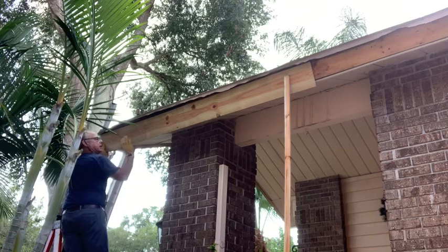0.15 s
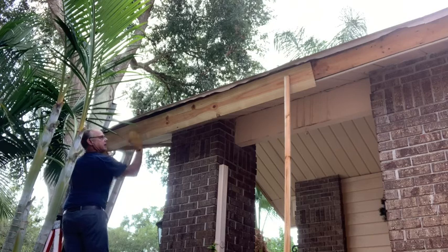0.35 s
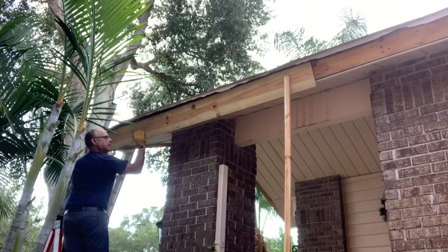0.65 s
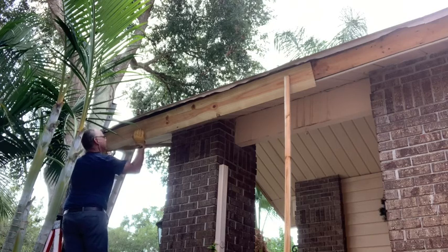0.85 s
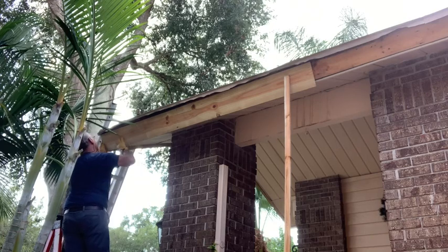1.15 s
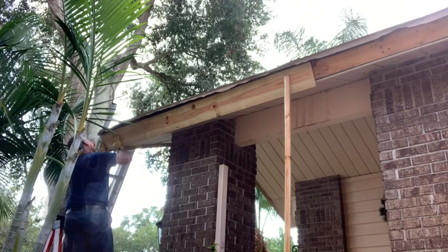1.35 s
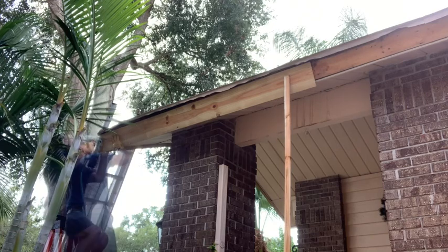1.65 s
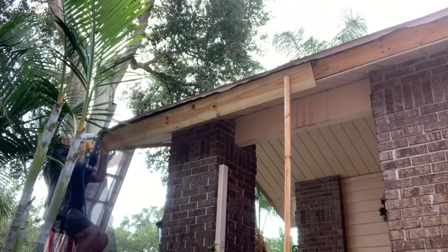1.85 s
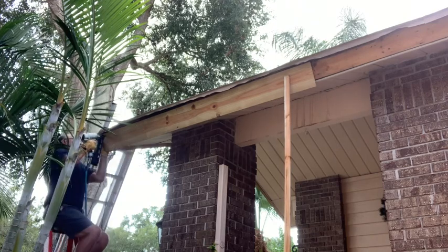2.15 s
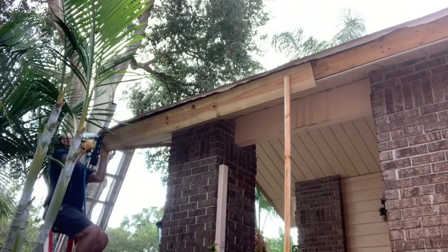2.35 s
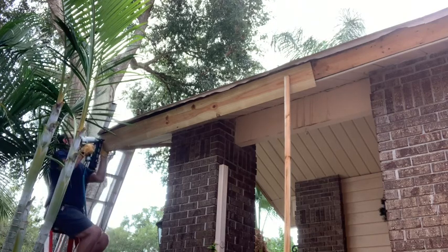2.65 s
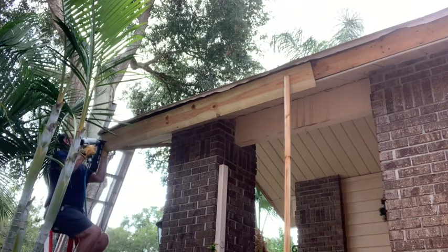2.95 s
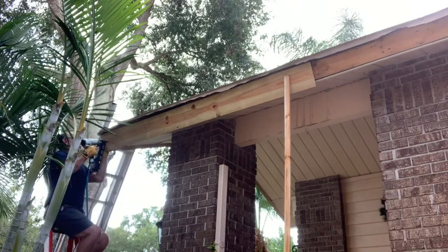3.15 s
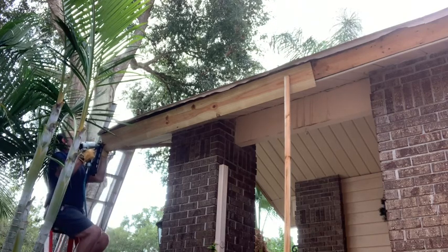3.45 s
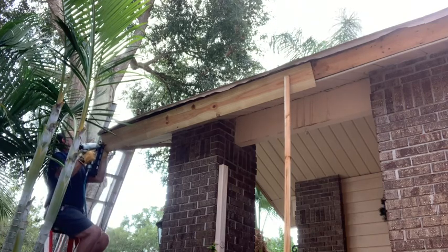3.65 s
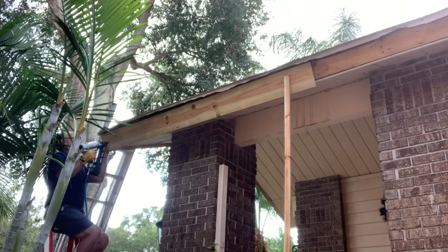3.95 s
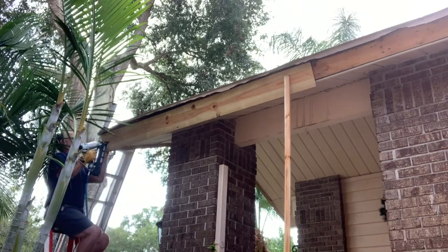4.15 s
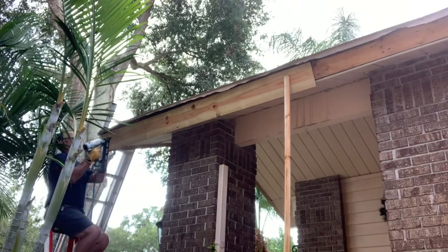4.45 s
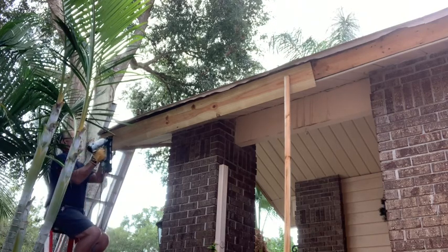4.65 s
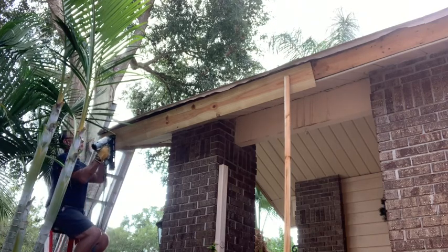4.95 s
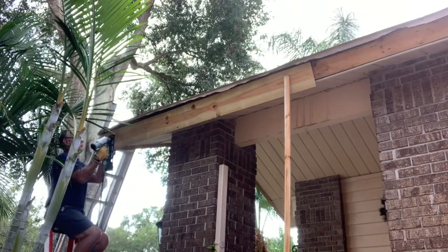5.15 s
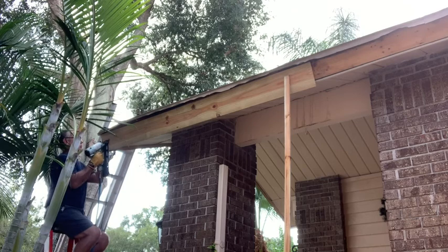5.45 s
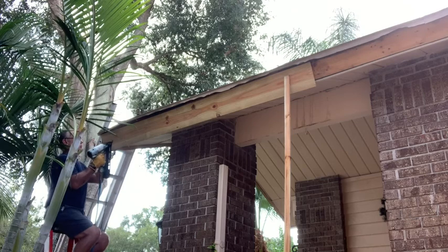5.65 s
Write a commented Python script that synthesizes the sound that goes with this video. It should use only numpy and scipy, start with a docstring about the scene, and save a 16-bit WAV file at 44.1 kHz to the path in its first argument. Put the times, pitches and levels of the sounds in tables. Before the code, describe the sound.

An air nailer drives nails into a wooden roof-edge board in quick clusters, with woody knocks, hissing exhaust and soft rustling between.

```python
"""An air nailer drives nails into a roof-edge board beside a brick porch, outdoors: each blow is a dense
rattle of contacts that rings board modes, plus a broad noise crack and a thud in the frame's modes.
Valve and exhaust jets are shaped bursts of noise, with a leak that builds while the trigger is held.
A hand slaps and rubs the board first; cloth and leaves rustle, all as shaped noise. Below lie low rumble
and far-off outdoor hiss, also noise, and late on one thin bird whistle, a falling sine."""
import sys
import numpy as np
from scipy import signal
from scipy.fft import rfft, irfft, next_fast_len
from scipy.io import wavfile

SR = 44100
rng = np.random.default_rng(int(sys.argv[2]) if len(sys.argv) > 2 else 0)


def inscribe(sig):
    """Save sig as 16-bit PCM at rate SR to the path in sys.argv[1].

    A 1-D sig is mono; a 2-D sig holds one channel per row.
    Samples are clipped to [-1, 1] before scaling.
    """
    pcm = np.round(np.clip(np.atleast_2d(sig).T, -1, 1) * 32767)
    wavfile.write(sys.argv[1], SR, pcm.astype(np.int16))


N = 255669


def from_db(db):
    """Decibel law for amplitude: 20 dB is a factor of ten."""
    return 10 ** (np.asarray(db) / 20)


def rms_one(x):
    """Normalization of power: scales to rms 1."""
    return x / np.sqrt(np.mean(x ** 2) + 1e-20)


def in_time(rows):
    """Linear interpolation of a curve's columns at every sample."""
    s, *columns = np.transpose(rows)
    return [np.interp(np.arange(N) / SR, s, c) for c in columns]


def at_hz(points, hz):
    """Logarithmic frequency scale: interpolates a table along it."""
    table_hz, values = np.array(points).T
    return np.interp(np.log(hz + 1), np.log(table_hz + 1), values)


def drift(rate_hz):
    """Low-passed random process: slow wandering of spread 1 with two poles at the given rate."""
    step = 40     # samples between the drawn points
    r = np.exp(-2 * np.pi * rate_hz * step / SR)
    settle = 2000     # points dropped while the filter settles
    raw = rng.standard_normal(N // step + settle + 2)
    slow = signal.lfilter([1], [1, -2 * r, r * r], raw)[settle:]
    return np.interp(np.arange(N) / step, np.arange(len(slow)), rms_one(slow))


# Left-right likeness of a diffuse sound. Each row: frequency in Hz, correlation of the sides (1 = alike).
SIDE_LIKENESS = [(60, 0.96), (130, 0.83), (290, 0.5), (640, 0.059), (5000, 0), (15000, 1)]


def noise(spectrum, channels=1):
    """Spectral shaping of white noise to rms 1; in stereo, mid and side mix to a set correlation."""
    size = next_fast_len(N)
    hz = np.fft.rfftfreq(size, 1 / SR)
    mid, side = rfft(rng.standard_normal((2, size))) * from_db(at_hz(spectrum, hz))
    if channels == 1:
        return rms_one(irfft(mid, size)[:N])
    alike = np.clip(at_hz(SIDE_LIKENESS, hz), -1, 1)
    left_right = np.sqrt(1 + alike) * mid + np.sqrt(1 - alike) * side * [[1], [-1]]
    return rms_one(irfft(left_right, size)[:, :N])


def envelope(events):
    """Power addition of bursts (s, dB, rise s, hold s, t60 s): rise, hold, exponential fall."""
    power = np.zeros(N)
    for s, level_db, rise, hold, t60 in events:
        i, t60 = round(s * SR), max(t60, .004)
        t = np.arange(min(N - i, round((hold + 2 * t60) * SR))) / SR
        fall_db = -60 * np.maximum(t - hold, 0) / t60
        gain = from_db(level_db + fall_db) * (1 - np.exp(-t / rise))
        power[i:i + len(t)] += gain ** 2
    return np.sqrt(power)


def body(modes, force):
    """Modal superposition: each row of force drives one damped resonance, and the modes add."""
    out = np.zeros(N)
    for (hz, level_db, t60), push in zip(modes, force):
        r, w = from_db(-60 / (t60 * SR)), 2 * np.pi * hz / SR
        ringing = signal.lfilter([0, np.sin(w)], [1, -2 * r * np.cos(w), r * r], push + 1e-18)
        out += from_db(level_db) * ringing
    return out


# Swing of the background. Each row: time in seconds, swing in dB before a layer takes its own share.
BACKGROUND_SWING = [(0, 0.5), (.8, 0.5), (1.3, 0.5), (1.6, -3.5), (2.3, -3), (2.9, 2.86), (3.4, -8),
                    (3.8, -11), (4.3, -8), (5.8, -11)]


def bed(start_db, share):
    """Slow amplitude modulation: a layer's gain follows its share of the background's swing."""
    return from_db(start_db + share * in_time(BACKGROUND_SWING)[0])


# Stirrings of hands, cloth and leaves. Each row: start in seconds, length in seconds, dull rub in dB,
# rustle in dB, high hiss in dB.
STIRRINGS = [(.5, 0.15, -53, -66, -91), (1.0, 0.097, -66, -50, -55), (1.15, 0.096, -70, -51.5, -54.5),
             (1.6, 0.059, -65, -54, -62.5), (1.72, 0.29, -71.5, -68, -66), (2.55, 0.16, -52, -53.5, -68.5),
             (3.3, 0.086, -55.5, -53, -77), (4.08, .45, -92, -91, -81.5)]
STIR_RISE_S, STIR_T60_S = 0.082, 0.44


def stirred(level_db):
    """Friction envelope: one layer of the stirrings rises softly, holds and fades."""
    return envelope((s, db, STIR_RISE_S, length, STIR_T60_S)
                    for (s, length, *_), db in zip(STIRRINGS, level_db))


# Spectra of the rumble. Each row: frequency in Hz, relative density in dB per Hz.
LOW_SPECTRUM = [(15, -51), (25, -22.5), (35, -5.5), (50, 5.5), (62, 2.5), (80, -12), (100, -5.5),
                (125, -21.5), (200, -81.5)]
LOW_MID_SPECTRUM = [(53, -34), (90, -22), (124, 1), (237, -15.5), (371, -21.5), (400, -23.5), (520, -51),
                    (880, -120)]
# Bumps through the frame. Each row: start in seconds, level in dB of the low bed, level in dB of the
# low-mid bed.
FRAME_BUMPS = [(.44, -28.5, -32.5), (2.602, -42, -43.5)]
BUMP_RISE_S, BUMP_HOLD_S, BUMP_T60_S = 0.014, 0.023, 0.71
# base level in dB and share of the background's swing
LOW_BED, LOW_MID_BED = (-46.5, .9), (-59.5, 0.77)


def rumble():
    """Incoherent addition: in each of two low noise bands, the power of bed and bumps adds."""
    out = np.zeros((2, N))
    for column, (spectrum, level) in enumerate([(LOW_SPECTRUM, LOW_BED), (LOW_MID_SPECTRUM, LOW_MID_BED)]):
        bumps = envelope((s, db[column], BUMP_RISE_S, BUMP_HOLD_S, BUMP_T60_S) for s, *db in FRAME_BUMPS)
        steady = bed(*level) * from_db(0.74 * drift(3))
        out += np.hypot(steady, bumps) * noise(spectrum, channels=2)
    return out


# Spectrum of rubbed wood. Each row: frequency in Hz, relative density in dB per Hz.
RUB_SPECTRUM = [(150, -31), (250, -5.5), (312, -5.5), (357, -5.5), (517, -4.5), (815, -0.5), (1000, -7.5),
                (1800, -11), (2340, -39), (3960, -120)]
RUB_BED = (-63.5, 1.3)     # base level in dB, share of the background's swing


def wood_rub(stir_db):
    """Sliding friction: dull noise whose power joins a bed and the stirrings, with a slight flutter."""
    level = np.hypot(bed(*RUB_BED), stirred(stir_db))
    return level * from_db(0.77 * drift(25)) * noise(RUB_SPECTRUM, channels=2)


# Spectrum of cloth and leaves. Each row: frequency in Hz, relative density in dB per Hz.
RUSTLE_SPECTRUM = [(710, -34), (1200, 1.5), (2930, -4), (3410, -5.5), (5380, -10.5), (8270, -10.5),
                   (9000, -28.5), (11700, -45.5), (19800, -120)]
RUSTLE_BED = (-69, 1.3)     # base level in dB, share of the background's swing


def rustle(stir_db):
    """Random friction of cloth and leaves: brighter noise with a stronger flutter."""
    level = np.hypot(bed(*RUSTLE_BED), stirred(stir_db))
    return level * from_db(1.8 * drift(30)) * noise(RUSTLE_SPECTRUM, channels=2)


# Spectrum of the far outdoors. Each row: frequency in Hz, relative density in dB per Hz.
OUTDOOR_SPECTRUM = [(120, -32.5), (200, 2), (274, -25.5), (300, -20), (476, -1.5), (676, -13.5),
                    (909, -3.5), (1360, -5.5), (3310, -22.5), (4700, -43), (16500, -41)]
FAR_DB = -71.5


def outdoors():
    """Diffuse field: steady far-off noise whose sides grow unlike as frequency climbs to 5 kHz."""
    return from_db(FAR_DB) * noise(OUTDOOR_SPECTRUM, channels=2)


# Bursts of compressed air. Each row: start in seconds, level in dB, hold in seconds, t60 in seconds.
AIR_BURSTS = [(0.417, -37.5, 0.022, 0.24), (1.295, -69, 0.0096, 0.15), (1.569, -50.5, 0.045, 0.24),
              (2.071, -31, 0.028, 0.13), (2.1, -16, 0.0089, 0.078), (2.118, -16.5, .0078, 0.17),
              (2.353, -14.5, 0.012, 0.16), (3.087, -35, 0.022, 0.11), (3.114, -15, 0.0062, 0.05),
              (3.130, -21, 0.013, 0.13), (3.173, -22, .024, .19), (4.959, -49, 0.03, 0.22),
              (4.987, -25.5, .01, 0.13), (5.005, -20, 0.008, 0.3), (5.161, -16.5, 0.0101, 0.22)]
BURST_RISE_SHARE = .07     # rise time as a share of the hold
# Held trigger and leak. Each row: shot in seconds, release in seconds, leak level in dB.
TRIGGER_HOLDS = [(2.18, 2.33, -31.5), (3.14, 3.204, -42), (5.04, 5.24, -46)]
LEAK_BUILD_S, LEAK_BLEED_T60_S = 0.11, 0.7
# Spectrum of the jets. Each row: frequency in Hz, relative density in dB per Hz.
AIR_SPECTRUM = [(900, -27.5), (1500, -8.5), (2700, -17.5), (3700, -7.5), (5200, -5), (7500, -2),
                (11200, 1.5), (15100, -2), (17000, -14.5)]
HISS_BED = (-80.5, 1.5)     # base level in dB, share of the background's swing


def air(stir_db):
    """Turbulent jet noise: valve and exhaust bursts flutter, the leak builds and bleeds off, hiss joins."""
    s, level_db, hold, t60 = np.transpose(AIR_BURSTS)
    bursts = envelope(zip(s, level_db, BURST_RISE_SHARE * hold, hold, t60))
    jets = bursts * from_db(1.8 * drift(79))
    leak = envelope((shot, db, LEAK_BUILD_S, release - shot, LEAK_BLEED_T60_S)
                    for shot, release, db in TRIGGER_HOLDS)
    hiss = np.hypot(bed(*HISS_BED), stirred(stir_db))
    return (jets + leak + hiss) * noise(AIR_SPECTRUM)


# Blows on board and tool. Each row: start in seconds, ring drive in dB, ring centre in Hz, ring focus in
# dB per octave, crack level in dB, thud drive in dB, crack t60 in seconds (the rattle takes half).
TOOL_BLOWS = [(.394, -48.5, 614, 25, -65, -64, 0.13), (.405, -44.5, 900, 25.5, -43, -48, 0.12),
              (.416, -27.5, 944, 25.5, -25.5, -27, .26), (.458, -32.5, 390, 18.5, -37.5, -27, .09),
              (1.683, -62, 2180, 8, -48.5, -53, .13), (2.06, -56, 820, 7, -40, -34, .6),
              (2.097, -34, 600, 5.5, -16.5, -27, .081), (2.118, -26, 1297, 12.5, -14, -35, .093),
              (2.341, -40, 700, 6, -23.5, -37.5, .1), (2.366, -38.5, 803, 5.5, -28, -29, .09),
              (2.39, -42.5, 954, 9.5, -36, -33.5, .1), (3.07, -61.5, 2050, 12.5, -54.5, -54.5, .11),
              (3.083, -30, 2020, 24, -36, -50.5, .021), (3.091, -32.5, 2080, 26.5, -38, -36.5, .12),
              (3.112, -33, 800, 10, -20, -33.5, .16), (3.129, -25.5, 1310, 17, -9.5, -32, .05),
              (3.135, -37, 1229, 2, -17.5, -41.5, .11), (3.140, -43, 2060, 22.5, -22, -43, .092),
              (3.218, -45, 970, 26.5, -32.5, -36, .079), (4.498, -76, 3500, 20, -77.5, -67.5, .2),
              (4.804, -76, 414.5, 19.5, -82, -59.5, .098), (4.955, -62, 1222, 6, -45, -46, .36),
              (4.990, -37, 2080, 3.5, -25.5, -42, .053), (5.005, -24.5, 1100, 33.5, -21.5, -36, .1),
              (5.014, -31.5, 1114, 10, -14, -46.5, .15), (5.15, -46, 580, 13.5, -33, -36, .047),
              (5.174, -45.5, 614, 1, -33.5, -30.5, .087), (5.196, -38, 930, 9, -33.5, -34.5, .13)]
# Modes of board and tool body. Each row: frequency in Hz, level in dB, t60 in seconds.
BOARD_MODES = [(363, -7.5, 0.076), (474.5, 0, 0.043), (580, 0.5, 0.032), (700, -6, 0.052), (850, -6, 0.11),
               (997.4, 2, 0.038), (1102, -3.5, 0.058), (1155, -9, 0.053), (1281, -15.5, 0.073),
               (1288, 2, 0.026), (1345, -13, 0.24), (1414, -10, 0.15), (1590, -7.5, 0.034),
               (1620, -8.5, 0.027), (1993, 0.5, .03), (2214, 2.5, .03), (3020, -7, .04), (3820, -6.5, 0.05),
               (4590, -10, 0.019)]
# Modes of the roof frame. Each row: frequency in Hz, level in dB, t60 in seconds.
FRAME_MODES = [(65, -2, 0.28), (96.6, -1.5, .2), (120.37, -0.5, .1), (173, 1, 0.11), (293.8, -3.5, 0.058)]
# Spectra of crack and snap. Each row: frequency in Hz, relative density in dB per Hz.
CRACK_SPECTRUM = [(120, -30), (300, -15), (700, 0), (1400, 1), (2100, 1.1), (3700, -4), (5800, -6.5),
                  (8400, -12.5), (11000, -43)]
SNAP_SPECTRUM = [(200, -19.5), (1000, -1.5), (4000, -2.5), (16000, -8.5)]
BLOW_RISE_S, SOFT_RISE_S = .0003, .00006     # base rise, and extra rise per dB/octave of focus
FIRST_CONTACT = 2.6     # scale of the opening contact against the rattle
# the snap over the crack in dB, its t60, and the dB it loses per dB/octave of focus
SNAP_DB, SNAP_T60_S, SNAP_LOSS = 3, 0.0054, .4


def blows():
    """Impact excitation: a rattle of contacts rings the board, with a broad crack and a frame thud."""
    s, ring_db, centre_hz, focus, crack_db, thud_db, t60 = np.transpose(TOOL_BLOWS)
    rise = BLOW_RISE_S + SOFT_RISE_S * focus     # softer contacts ring more narrowly and rise slower

    shape = (len(BOARD_MODES), N)
    contacts = (rng.random(shape) < 6000 / SR) * rng.standard_normal(shape)     # about 6000 a second
    opening = FIRST_CONTACT * rng.uniform(0.23, 2.3, (len(s), len(BOARD_MODES))).T
    contacts[:, np.round((s + rise) * SR).astype(int)] = opening
    rattle = []
    for hz, *_ in BOARD_MODES:     # where the blow lands decides which modes it favours
        near_db = -focus * np.abs(np.log2(hz / centre_hz))
        rattle.append(envelope(zip(s, ring_db + near_db, rise, 2 * rise, t60 * .5)))
    ring = body(BOARD_MODES, contacts * rattle)

    crack = envelope(zip(s, crack_db, rise, 2 * rise, t60)) * noise(CRACK_SPECTRUM)
    snap_db = crack_db + SNAP_DB - SNAP_LOSS * focus
    snap = envelope((at, db, .0002, .0005, SNAP_T60_S) for at, db in zip(s, snap_db)) * noise(SNAP_SPECTRUM)

    push = np.zeros((len(FRAME_MODES), N))
    strength = from_db(thud_db[:, None]) * rng.normal(1, .25, (len(s), len(FRAME_MODES)))
    push[:, np.round(s * SR).astype(int)] = strength.T
    push[1::2] *= -1     # neighbouring modes swing in opposite directions
    soft_push = signal.lfilter([.02], [1, -.98], push)
    return ring + crack + snap + body(FRAME_MODES, soft_push)


# Bird whistle. Each row: time in seconds, mean pitch in Hz, mean level in dB.
BIRD_WHISTLE = [(4.6, 3500, -90), (4.68, 3380, -86), (4.75, 3270, -84), (4.8, 3190, -80), (4.86, 3100, -83),
                (4.92, 3000, -85)]


def whistle():
    """Frequency modulation: a faint falling sine that wavers in pitch and level."""
    hz, level_db = in_time(BIRD_WHISTLE)
    t = np.arange(N) / SR
    fade_s = 0.032
    on = np.clip(np.minimum(t - BIRD_WHISTLE[0][0], BIRD_WHISTLE[-1][0] - t) / fade_s, 0, 1)
    gain = np.sqrt(2) * on * from_db(level_db + 3.5 * drift(26))
    phase = 2 * np.pi * np.cumsum(hz + 14 * drift(29)) / SR
    return gain * np.sin(phase)


def band_pass(x, edges_hz):
    """Band limiting: a Butterworth filter keeps what lies between two edges."""
    return signal.sosfilt(signal.butter(2, edges_hz, "band", fs=SR, output="sos"), x)


# Decay of the brick porch. Each row: frequency in Hz, t60 in seconds.
PORCH_DECAY = [(300, 0.37), (1000, 0.31), (4000, 0.37), (12000, 0.033)]
# Edges of the yard's band, low then high, in Hz.
YARD_BAND_HZ = [900, 3600]
PORCH_DB, EAVES_DB, YARD_DB = -12, -6, -33.5
EAVES_T60_S, YARD_T60_S = 0.028, 1.13


def porch(x):
    """Convolution reverberation: eaves cluster, walls decaying by band and a faint yard tail, per side."""
    t = np.arange(SR) / SR
    walls = np.zeros((2, SR))
    for low in 240 * 2. ** np.arange(6):     # octave bands
        band = band_pass(rng.standard_normal((2, SR)), [low, 2 * low])
        walls += band * from_db(-60 * t / at_hz(PORCH_DECAY, np.sqrt(2) * low))
    walls *= np.clip((t - .006) / 0.0028, 0, 1)     # the first walls answer after a few ms
    eaves = rng.standard_normal((2, SR)) * from_db(-60 * t / EAVES_T60_S) * np.clip(t / .0008, 0, 1)
    eaves = band_pass(eaves, [250, 7000])
    yard = rng.standard_normal((2, SR)) * from_db(-60 * t / YARD_T60_S) * np.clip(t / 0.087, 0, 1)
    yard = band_pass(yard, YARD_BAND_HZ)
    echoes = from_db(YARD_DB) * rms_one(yard)
    echoes += from_db(PORCH_DB) * rms_one(walls)
    echoes += from_db(EAVES_DB) * rms_one(eaves)
    echoes /= np.sqrt(SR)     # levels become gains of the whole echo's energy
    return signal.fftconvolve(x[None], echoes, axes=1)[:, :N]


def delayed(x, lag_s):
    """Fourier shift theorem: a phase slope delays by a fraction of a millisecond."""
    size = next_fast_len(N + 64)
    hz = np.fft.rfftfreq(size, 1 / SR)
    return irfft(rfft(x, size) * np.exp(-2j * np.pi * hz * lag_s), size)[:N]


BOARD_LEFT_LAG_S, AIR_LEFT_LAG_S = 0.00027, 0.0002635


def scene():
    """Interaural-style time difference: work reaches the right first; porch and far sounds surround it."""
    rub_db, rustle_db, hiss_db = np.transpose(STIRRINGS)[2:]
    background = rumble() + wood_rub(rub_db) + rustle(rustle_db) + outdoors()
    jets, knocks = air(hiss_db), blows()
    right = knocks + jets
    left = delayed(knocks, BOARD_LEFT_LAG_S) + delayed(jets, AIR_LEFT_LAG_S)
    return np.array([left, right]) + porch(right) + background + whistle()


def record(dry):
    """Band limits and saturation: the microphone drops the deepest bass, peaks round, the top is cut."""
    bass_cut_hz, top_cut_hz = 42, 16700
    x = signal.sosfilt(signal.butter(2, bass_cut_hz, "high", fs=SR, output="sos"), dry)
    rounded = 1.2 * np.tanh(x / 1.2)
    return signal.sosfilt(signal.cheby2(20, 70, top_cut_hz, fs=SR, output="sos"), rounded)


dry = scene()
out = record(dry)
inscribe(out)
```